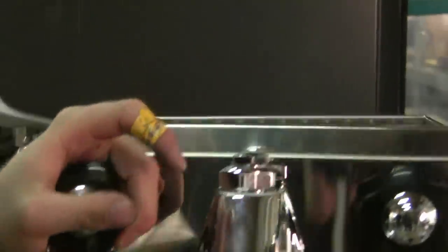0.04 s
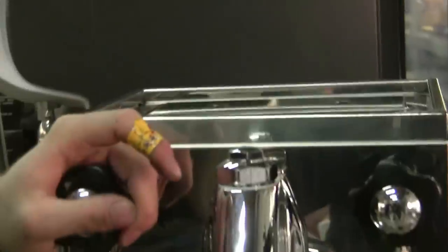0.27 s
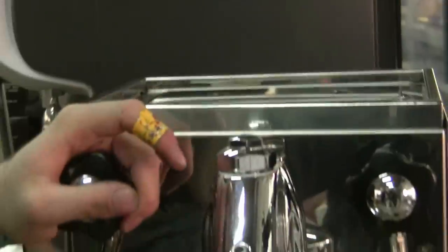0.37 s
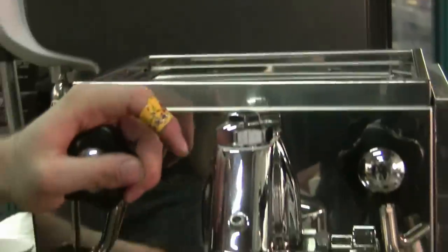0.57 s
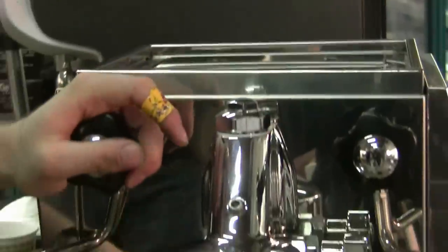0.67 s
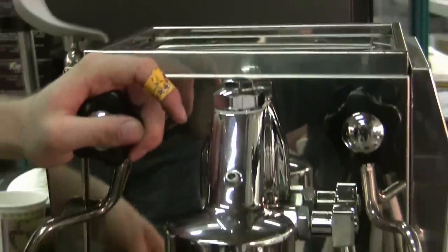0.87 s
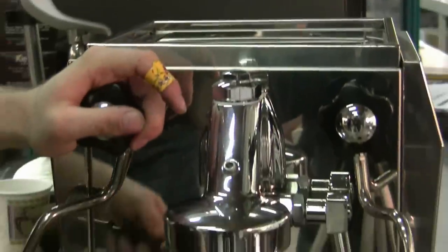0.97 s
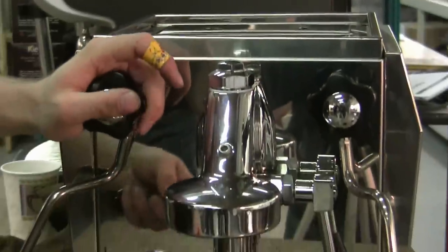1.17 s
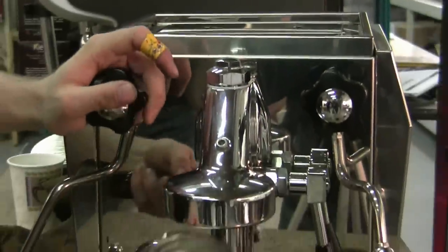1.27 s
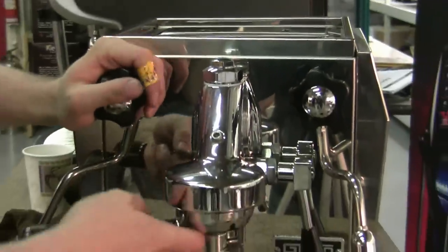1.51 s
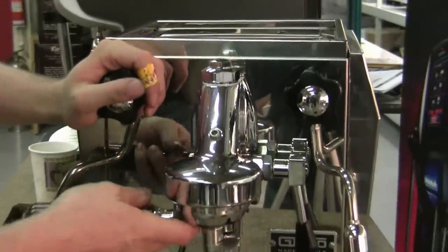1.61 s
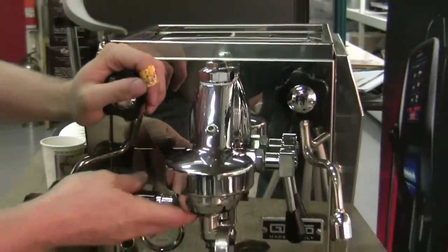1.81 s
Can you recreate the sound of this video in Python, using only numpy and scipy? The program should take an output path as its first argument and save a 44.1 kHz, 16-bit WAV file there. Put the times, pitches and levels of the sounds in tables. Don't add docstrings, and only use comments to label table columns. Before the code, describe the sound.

Espresso machine metal clanks: one hard overloaded bang, light jostling, then a portafilter rattling into place

```python
import sys
import numpy as np
from scipy import signal
from scipy.fft import rfft, irfft
from scipy.io import wavfile

SR = 44100
rng = np.random.default_rng(int(sys.argv[2]) if len(sys.argv) > 2 else 0)


def natural_amplitude(level_db):
    exponent = np.asarray(level_db, float) / 20
    return 10 ** exponent


def materialize(psi):
    bounded = np.clip(np.atleast_2d(psi).T, -1, 1)
    quanta = np.round(bounded * 32767).astype(np.int16)
    wavfile.write(sys.argv[1], SR, quanta)


N = 81585

# start_s, level_db, pitch_hz, t60_s
BANG_CONTACTS = [
    (.2397, -0.5, 1403, 0.025),
    (.2410, -3.5, 3380, 0.012),
    (.2430, -14, 1024, 0.039),
]
# frequency_hz, level_db (per Hz)
JOSTLE_CRACK = [(150, -42), (400, -11), (620, 1), (810, -3), (1200, -7.5), (2960, -17), (15600, -71)]


def at_hz(points, hz):
    p = np.array(points)
    return np.interp(np.log(np.maximum(hz, 10)), np.log(p[:, 0]), p[:, 1])


def colour(x, points):
    hz = np.arange(N // 2 + 1) * SR / N
    return irfft(rfft(x) * natural_amplitude(at_hz(points, hz)), N)


def rms_one(x):
    return x / np.sqrt(np.mean(x ** 2) + 1e-20)


def fade(start_s, t60):
    t = np.maximum(np.arange(N) / SR - start_s, 0)
    return (1 - np.exp(-t / 0.00059)) * natural_amplitude(-60 * t / t60)


def fades(starts):
    return sum(natural_amplitude(db) * fade(start_s, t60) for start_s, db, t60 in starts)


def lumps(depth_db, rate_hz):
    r = np.exp(-2 * np.pi * rate_hz / SR)
    slow = signal.lfilter([1], [1, -2 * r, r * r], rng.standard_normal(N))
    return natural_amplitude(depth_db * rms_one(slow))


def ring(clicks, hz, t60):
    r, w = natural_amplitude(-60 / (t60 * SR)), 2 * np.pi * hz / SR
    return signal.lfilter([0, np.sin(w)], [1, -2 * r * np.cos(w), r * r], clicks + 1e-18)


def burst(start_s, db, hz, t60, rise):
    t = np.arange(int(2 * t60 * SR)) / SR
    out, first = np.zeros(N + SR), int(start_s * SR)
    envelope = natural_amplitude(db - 60 * t / t60) * (1 - np.exp(-t * hz / rise))
    out[first:first + len(t)] += envelope * np.sin(2 * np.pi * hz * t)
    return out[:N]


def contacts(rows, modes, crack, crack_db, crack_t60):
    start_s, db = np.array(rows)[:, 0], np.array(rows)[:, 1]
    out = np.zeros(N)
    for s, level_db, hz, t60 in rows:
        out += burst(s, level_db, hz, t60, rise=0.52)
        out += burst(s, level_db - 11, hz * 1.09, t60, rise=1.1)
    noise = rms_one(colour(rng.standard_normal(N), crack))
    out += natural_amplitude(crack_db) * noise * sum(natural_amplitude(d) * fade(s, crack_t60) for s, d in zip(start_s, db))
    chatter = lumps(3, 50)
    luck_db = rng.normal(0, 2.5, (len(start_s), len(modes)))
    for k, (hz, level_db, t60) in enumerate(modes):
        clicks = np.zeros(N)
        clicks[(start_s * SR).astype(int)] = natural_amplitude(db + level_db + luck_db[:, k])
        out += ring(clicks, hz, t60) * (chatter if hz < 6000 else 1)
    return out


def shudder(starts, spectrum, depth_db):
    noise = rms_one(colour(rng.standard_normal(N), spectrum))
    return fades(starts) * lumps(depth_db, 60) * noise


def rattle(starts, modes):
    ticks_per_s, detune = 450, .035
    env = fades(starts)
    out = 0
    for hz, db, t60 in modes:
        for shift in (0, -detune, detune):
            strength = natural_amplitude(4.0 * np.minimum(rng.exponential(1, N), 3))
            happens = rng.random(N) < ticks_per_s / SR
            ticks = strength * happens * rng.choice([-1, 1], N)
            ringing = ring(ticks * env, hz * (1 + shift * rng.uniform(.5, 1.5)), t60)
            out = out + natural_amplitude(db - 16) * ringing / np.sqrt(ticks_per_s * t60 / 5)
    return out


def ventilation():
    # frequency_hz, level_db (per Hz)
    air = [(15, -54), (25, -19), (113, -6.5), (312, -12), (385, -9.5), (444, -19), (800, -14), (966, -17),
           (7000, -48.5), (9100, -48.5), (15400, -120)]
    # frequency_hz, width_hz, peak_db
    duct = [(132, 26, 5.3), (430, 26, 1.3), (531, 30, 13), (790, 40, 2.6)]
    # frequency_hz, level_db
    side_air = [(60, -19), (240, -14), (950, -12), (3770, -0.5), (15000, 6)]
    hz = np.arange(N // 2 + 1) * SR / N
    peaks = natural_amplitude(sum(db / (1 + (2 * (hz - f) / width) ** 2) for f, width, db in duct))
    mid, side = irfft(rfft(rng.standard_normal((2, N))) * peaks * natural_amplitude(at_hz(air, hz)), N)
    gain = natural_amplitude(-36.5) / np.std(mid)
    return gain * mid, gain * colour(side, side_air)


def hiss():
    high = signal.butter(1, 4000, "high", fs=SR, output="sos")
    white = signal.sosfilt(high, rng.standard_normal((2, N)))
    before_bang = np.arange(N) / SR < BANG_CONTACTS[0][0]
    return white * natural_amplitude(-61 - 6 * before_bang)


def pings():
    # start_s, level_db, pitch_hz, t60_s
    touches = [(0.094, -50.5, 2820, 0.31), (.656, -37, 8000, 0.066), (.656, -44, 9200, 0.073),
               (.657, -37, 10470, 0.046), (.672, -35, 6500, .02), (.672, -37, 9100, 0.026),
               (.698, -36, 8940, .02), (.700, -40, 6200, .02), (0.7824, -44, 4600, 0.045),
               (.839, -44, 13800, .015), (.841, -40, 10300, 0.013), (.842, -56, 12400, .12),
               (.868, -38, 6200, 0.012), (.900, -47, 10000, 0.0091), (.900, -48, 14100, .015),
               (1.4755, -10, 2360, .02), (1.519, -31, 8000, .06), (1.538, -15, 5270, .03),
               (1.540, -28, 8840, 0.061), (1.606, -32, 4608, .1), (1.606, -39, 10900, 0.023),
               (1.688, -39, 12500, .015), (1.664, -40, 5280, .03), (1.689, -29, 3200, .04),
               (1.721, -36, 3200, .03), (1.736, -40, 3140, 0.017), (1.7476, -33, 3126, .08),
               (1.773, -41, 3230, 0.032)]
    return sum(burst(*row, rise=1.5) for row in touches)


def slam_and_thuds():
    # start_s, level_db, pitch_hz, t60_s
    slam = [
        (.2240, 9.5, 159, .05),
        (.2248, 4, 481, .03),
        (.2250, 0, 765, .03),
        (.2290, -4, 478, .04),
        (.241, -4, 255, .07),
    ]
    # start_s, level_db, pitch_hz, t60_s
    thuds = [(.2225, 0, 720, 0.011), (.2370, 1.5, 712, 0.035), (0.273, -12.5, 252, 0.091),
             (.2722, -4, 606, 0.012), (0.2794, 2, 790, 0.0078), (0.305, -15, 426, 0.013),
             (0.359, -23, 300, 0.043), (0.579, -19.5, 144, 0.053), (0.654, -10.5, 238, 0.063),
             (0.672, -19.5, 246, 0.064), (0.784, -17.5, 224, 0.08), (0.799, -22, 221, 0.099),
             (0.9201, -13, 251, 0.057), (0.941, -17.5, 237, 0.078), (1.45, -8.5, 154, 0.1),
             (1.522, -11.5, 162.6, 0.16), (1.497, -20, 293, 0.12), (1.544, -18, 356.6, 0.58),
             (1.589, -30, 252, 0.29), (1.537, -20, 140, 0.16), (1.652, -18.5, 873, 0.11),
             (1.692, -29.5, 263, 0.14),]
    return sum(burst(*row, rise=.45) for row in slam + thuds) * lumps(1.5, 50)


def case_shudder():
    # frequency_hz, level_db (per Hz)
    panels = [(15, -44), (25, -6.5), (160, -1.5), (380, -2), (496, -6.5), (1670, -12), (6580, -32),
              (9090, -32.5), (15600, -41.5)]
    # start_s, level_db, t60_s
    starts = [
        (.226, -10.5, 0.12),
        (.228, -16.5, 1.057),
    ]
    return shudder(starts, panels, depth_db=1.5)


def bang():
    # frequency_hz, level_db, t60_s
    case = [(8968, -29, .55), (14190, -43, .26), (14930, -38, .5), (12455, -29, .2)]
    # frequency_hz, level_db (per Hz)
    crack = [(180, -40), (400, -13), (1000, -6), (1400, -12), (2610, -19), (9030, -24.5), (15600, -34.5)]
    ringing = sum(burst(BANG_CONTACTS[1][0], db, hz, t60, rise=5) for hz, db, t60 in case)
    return ringing + contacts(BANG_CONTACTS, [], crack, crack_db=-3.5, crack_t60=0.023)


def tray_rattle():
    # frequency_hz, level_db, t60_s
    tray = [(1424, 0, 0.095), (1647, -11, .07), (2357, 4, .07), (2842, 5.5, 0.13), (3210, -3, 0.053),
            (3600, 1.5, .06), (4520, -1, .07)]
    # start_s, level_db, t60_s
    starts = [
        (.243, -21.5, 0.55),
        (.66, -38, 0.23),
        (.828, -34.5, 0.1),
        (.9, -44.5, 0.058),
    ]
    return rattle(starts, tray)


def knock():
    # start_s, level_db, pitch_hz, t60_s
    knocks = [
        (.652, -16, 1250, 0.025),
        (.6545, -12.5, 4486, 0.019),
        (.6555, -13, 1790, 0.019),
        (.6705, -16.5, 2370, 0.024),
        (.674, -18, 4500, 0.017),
    ]
    # frequency_hz, level_db, t60_s
    wand = [(1790, -31, 0.12), (4500, -30, 0.19), (4600, -40, 0.29)]
    # frequency_hz, level_db (per Hz)
    crack = [(350, -47), (600, -24), (1830, 3), (3730, -15.5), (4450, -5), (5840, -20), (15600, -22)]
    # start_s, level_db, t60_s
    tail_starts = [
        (.657, -36.5, 0.65),
    ]
    metal = contacts(knocks, wand, crack, crack_db=-9.5, crack_t60=0.026)
    return metal, shudder(tail_starts, crack, depth_db=.8)


def scuffs():
    # start_s, level_db, t60_s
    starts = [
        (.828, -21, .22),
        (.860, -27, .12),
        (.893, -25, .12),
        (.912, -27, .08),
        (.657, -32, .4),
    ]
    return shudder(starts, JOSTLE_CRACK, depth_db=2.5)


def jostle():
    # start_s, level_db, pitch_hz, t60_s
    bumps = [(.8275, -18.5, 1310, 0.02), (.8285, -14, 1900, 0.021), (.839, -22, 2750, 0.015),
             (.849, -34.5, 6100, 0.03), (.862, -33, 3050, 0.0081), (.869, -46, 3930, 0.011),
             (.840, -36.5, 7600, 0.011), (.894, -42, 2470, .02), (.9035, -25.5, 2540, 0.044),
             (.9135, -43, 1250, 0.0083), (.955, -31, 2430, 0.013)]
    return contacts(bumps, [], JOSTLE_CRACK, crack_db=-7, crack_t60=.03)


def squeaks():
    # time_s, pitch_hz, level_db
    paths = [
        [(1.07, 10236, -79), (1.148, 12600, -58), (1.155, 12331, -119)],
        [(1.15, 7970, -70), (1.206, 8700, -67), (1.39, 8406, -91)],
        [(1.2, 13600, -72), (1.29, 14000, -70), (1.335, 13100, -82)],
        [(1.35, 13006, -91), (1.358, 12730, -66), (1.375, 12500, -74), (1.43, 13900, -74)],
    ]
    t, out = np.arange(N) / SR, 0
    for rows in paths:
        s, hz, db = np.transpose(rows)
        on = np.clip(np.minimum(t - s[0], s[-1] - t) / 0.01, 0, 1)
        phase = 2 * np.pi * np.cumsum(np.interp(t, s, hz)) / SR
        out = out + on * np.sqrt(2) * natural_amplitude(np.interp(t, s, db)) * np.sin(phase)
    return out * lumps(5.4, 22)


def portafilter_fit():
    # start_s, level_db, pitch_hz, t60_s
    clacks = [(1.4458, 4, 1474, 0.01), (1.4465, -7, 4110, 0.016), (1.4470, -20, 7770, 0.11),
              (1.480, -39, 9760, 0.22), (1.4747, -2, 1260, 0.033), (1.4755, -18, 3450, 0.024),
              (1.47910, -5, 1254, 0.037), (1.5031, -14.5, 1255, 0.053), (1.5183, -2, 3910, 0.017),
              (1.5290, -8, 3850, 0.021), (1.5378, -4, 2040, 0.016), (1.5395, -6, 4000, 0.0091),
              (1.547, -13, 2290, 0.073), (1.6503, -13, 2830, 0.0064), (1.654, -22.5, 4580, 0.008),
              (1.687, -26, 4430, 0.012)]
    # frequency_hz, level_db, t60_s
    group = [(1329, -18, 0.1), (1930, -21.5, 0.098), (3190, -32.5, 0.34), (3670, -28, 0.16),
             (4670, -29, 0.11)]
    # frequency_hz, level_db (per Hz)
    crack = [(350, -39), (600, -20), (767, -30), (1340, -16), (2650, -14), (3930, -8.5), (6170, -30.5),
             (15600, -28)]
    return contacts(clacks, group, crack, crack_db=-11, crack_t60=.03)


def lug_rattle():
    # frequency_hz, level_db, t60_s
    lugs = [(1160, -13, 0.078), (1320, 2.5, 0.12), (1530, -9, 0.04), (1610, -14, 0.054),
            (1920, -7.5, 0.079), (2300, 0.5, 0.13), (2740, -12, 0.054), (2840, -15, .05), (3230, -3, 0.046),
            (3400, -18, 0.033), (3700, -6.5, 0.026), (4608, -5, 0.041), (5250, -15, 0.032)]
    # start_s, level_db, t60_s
    starts = [
        (1.447, -15, .3),
        (1.54, -19, .5),
        (1.652, -31, .5),
        (1.747, -39, .4),
    ]
    return rattle(starts, lugs)


def body_settle():
    # frequency_hz, level_db (per Hz)
    body = [(35, -50), (60, -11.5), (351, -2), (395, -9), (891, -6), (1070, -14), (2310, -20),
            (15600, -61.5)]
    # start_s, level_db, t60_s
    starts = [
        (1.448, -21.5, 0.73),
        (1.54, -20.5, 0.29),
        (1.652, -30, 0.93),
    ]
    return shudder(starts, body, depth_db=1.5)


def workshop(x):
    # frequency_hz, t60_s
    room_t60 = [(60, 1), (300, 0.96), (1500, 0.32), (5000, 0.39), (14000, 0.32)]
    t, tail = np.arange(SR) / SR, 0
    white = rng.standard_normal((2, SR))
    for low in 40 * 2.0 ** np.arange(8):
        high = 2 * low if low < 5000 else 18000
        band = signal.sosfilt(signal.butter(2, [low, high], "band", fs=SR, output="sos"), white)
        decay = natural_amplitude(-60 * t / at_hz(room_t60, 1.65 * low))
        tail = tail + band * decay * (1 - np.exp(-t / 0.0011))
    tail = tail / np.sqrt(np.sum(tail[0] ** 2))
    return signal.fftconvolve(x[None], tail, axes=1)[:, :N]


def scene():
    # frequency_hz, level_db
    side_hits = [(60, -41), (240, -34), (950, -12.5), (3770, -2.5), (15000, -4)]
    knock_metal, knock_tail = knock()
    dull = slam_and_thuds() + case_shudder() + knock_tail + scuffs() + squeaks() + body_settle()
    metal = pings() + bang() + tray_rattle() + knock_metal + jostle() + portafilter_fit() + lug_rattle()
    wet, wide = workshop(dull + natural_amplitude(-4) * metal)
    hits = dull + metal
    air, air_side = ventilation()
    mid = hits + natural_amplitude(-12.5) * wet + air
    lean = natural_amplitude(-13) * hits
    side = colour(natural_amplitude(-4.0) * wide + lean, side_hits) + air_side
    return np.array([mid + side, mid - side]) + hiss()


def band_limit(x):
    return signal.sosfilt(signal.butter(12, 15730, fs=SR, output="sos"), x)


def record(dry):
    x = signal.sosfilt(signal.cheby2(14, 26, 15650, fs=SR, output="sos"), dry)
    x = signal.sosfilt(signal.butter(2, 40, "high", fs=SR, output="sos"), x)
    x = np.tanh(np.abs(x) ** 12) ** (1 / 12) * np.sign(x)
    return band_limit(x)


dry = scene()
out = record(dry)
materialize(out)
```